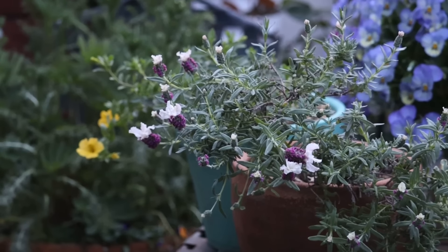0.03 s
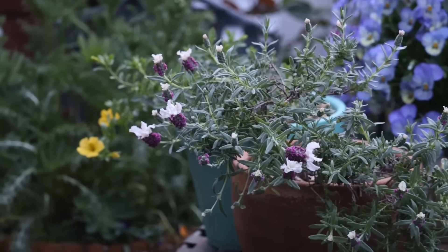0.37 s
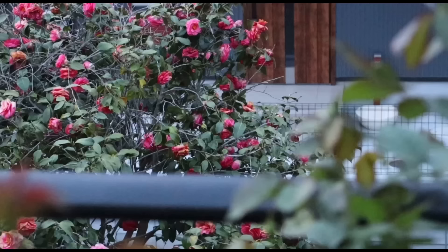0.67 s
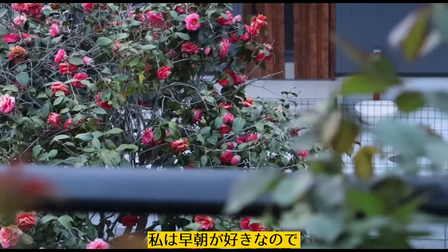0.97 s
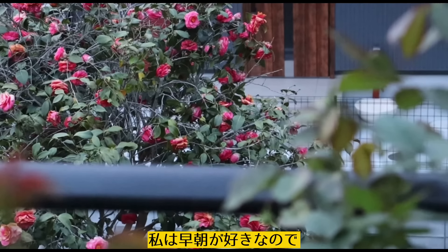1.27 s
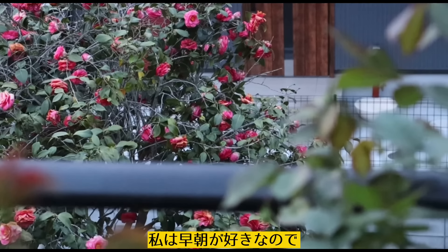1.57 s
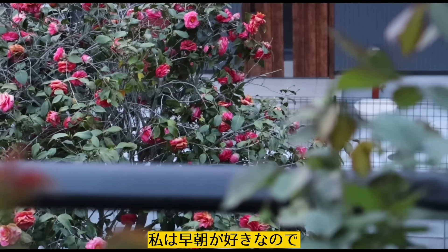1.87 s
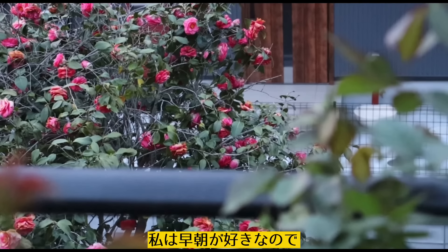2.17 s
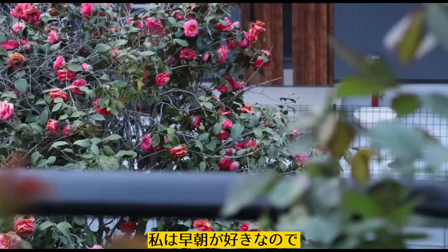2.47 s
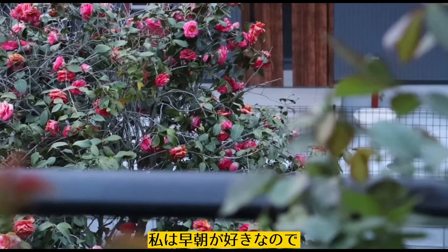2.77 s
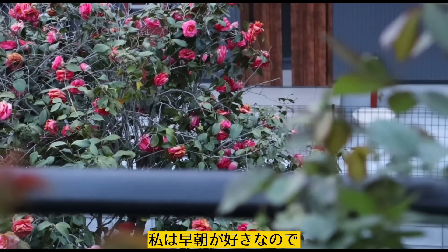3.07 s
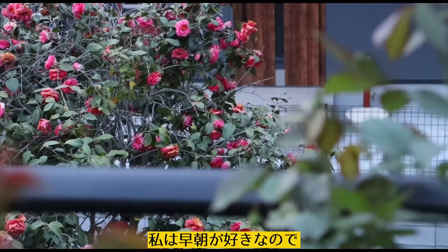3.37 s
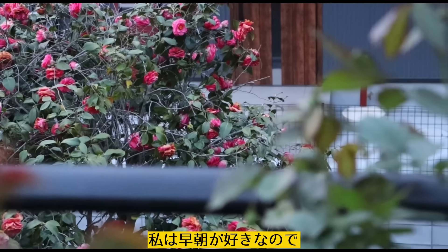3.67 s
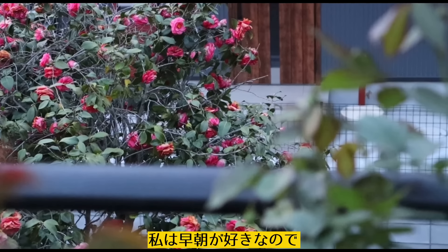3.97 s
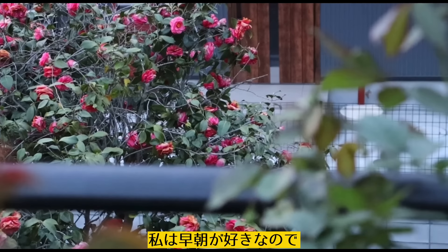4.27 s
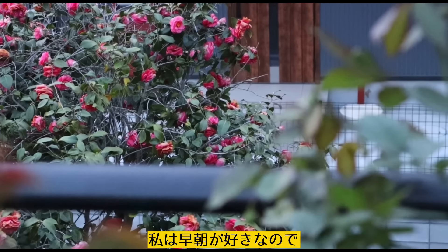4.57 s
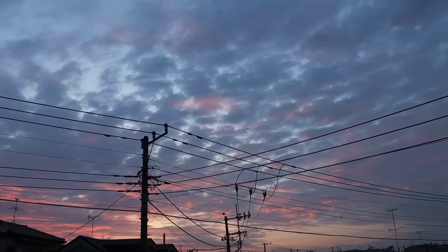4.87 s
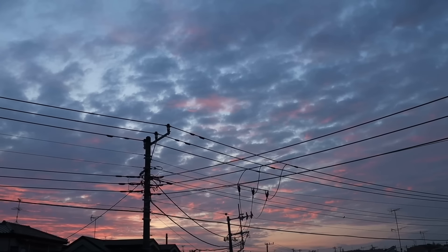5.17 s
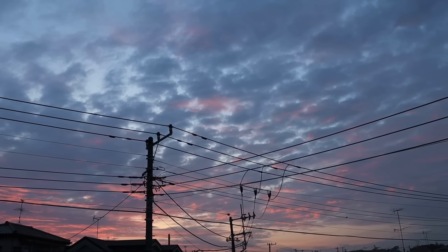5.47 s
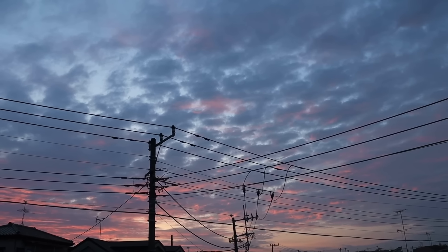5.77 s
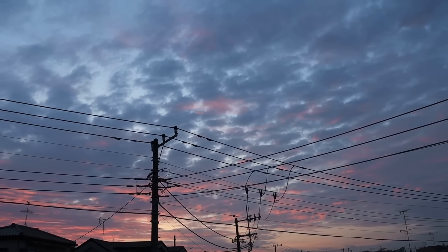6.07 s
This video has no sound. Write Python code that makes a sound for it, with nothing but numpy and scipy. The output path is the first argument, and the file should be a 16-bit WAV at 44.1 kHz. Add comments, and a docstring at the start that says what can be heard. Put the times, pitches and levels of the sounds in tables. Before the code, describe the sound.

A small bird gives sharp chinks, harsh falling calls and rising whistles, with soft twittering between, over a faint distant town.

```python
"""A small bird in a town garden

Over the low wash of a distant town a bird twitters softly between its calls: warbled chinks, harsh
falling chacks and chirps that end in a rising whistle. The two sides of its syrinx are the source,
its throat the filter. Walls and shrubs throw the calls back, and a few tiny ticks come late."""
import sys
import numpy as np
from scipy import signal
from scipy.fft import rfft, irfft
from scipy.io import wavfile
from scipy.ndimage import map_coordinates

SR = 44100
rng = np.random.default_rng(int(sys.argv[2]) if len(sys.argv) > 2 else 0)


def bounce(signal):
    """Save signal as a 16-bit WAV file at the path given by the first command-line argument."""
    frames = np.transpose(np.atleast_2d(signal))
    limited = np.clip(frames, -1, 1)
    pcm = np.round(limited * 32767).astype(np.int16)
    wavfile.write(sys.argv[1], SR, pcm)


N = 270333

# A short high rasp. Every note has the fields length_s, from_hz, to_hz, turn_s, glide_s, level_db,
# attack_s, release_s, overtones_db, rough; some add scoop, droop, warble, hold_s, fade_db.
RASP_NOTE = dict(length_s=0.0367, from_hz=4800, to_hz=5900, turn_s=0.0076, glide_s=0.0028, level_db=-10, attack_s=0.034, release_s=0.0025, overtones_db=(-15, -4),
             rough=(1.1, 0.58))


def undb(db):
    """Amplitude ratio of a level in decibels."""
    return 10 ** (np.asarray(db) / 20)


def unit(x):
    """Normalisation to rms 1."""
    return x / np.sqrt(np.mean(x ** 2))


def gain_at(hz, points):
    """Frequency response: gain between (frequency_hz, level_db) points on a log-frequency axis."""
    f, db = np.transpose(points)
    return undb(np.interp(np.log(np.maximum(hz, 1)), np.log(f), db))


def noise(points, size):
    """Spectral shaping: white noise filtered to the given spectrum, at rms 1."""
    white = rfft(rng.standard_normal(size))
    return unit(irfft(white * gain_at(np.fft.rfftfreq(size, 1 / SR), points), size))


def stereo_noise(points, alike_hz=600):
    """A diffuse field of rms 1: the two sides are coherent in the bass, unrelated in the treble."""
    f = np.fft.rfftfreq(N, 1 / SR)
    mid, side = (rfft(noise(points, N)) for _ in range(2))
    coherence = .97 / (1 + (f / alike_hz) ** 2)
    spectra = mid * np.sqrt(1 + coherence) + side * np.sqrt(1 - coherence) * np.array([[1], [-1]])
    return unit(irfft(spectra, N))


def flutter(rate_hz, size):
    """Random modulation: a smooth wandering with a spread near 1."""
    position = np.arange(size) / SR * rate_hz
    return map_coordinates(rng.standard_normal(int(position[-1]) + 2), [position], order=2, mode="nearest")


def add(track, start_s, sound):
    """Superposition: a sound joins the track at start_s."""
    i = max(int(start_s * SR), 0)
    part = sound[:max(N - i, 0)]
    track[i:i + len(part)] += part


def town(hiss_db=-61, hum_hz=100, hum_db=-66, whine_hz=520, whine_db=-9, whine_s=5.6, sag_hz_per_s=45):
    """Distant sources sum to a diffuse wash with hum and hiss; traffic ebbs and returns as a drone."""
    # noise spectra: frequency_hz, density_db
    wash_spectrum = [(15, -50), (25, -23), (70, -2), (119, 1), (257, -3), (470, -16.5), (642, -12.5),
                     (730, -15.5), (961, -8.5), (1550, -19), (1860, -14.5), (2000, -30), (2600, -41),
                     (4400, -120)]
    traffic_spectrum = [(100, -21), (300, 3), (700, 1), (1100, -2), (1800, -7.5), (5000, -13), (9000, -57)]
    drone_spectrum = [(100, -23), (210, 4), (330, 1), (440, 4), (530, -1.5), (640, -21), (850, -22),
                      (1100, 2), (1500, -2), (4000, -20)]
    hiss_spectrum = [(1000, -58), (2000, -3), (4000, -1), (6000, -4), (8000, -9.5), (12500, -9),
                     (13400, -6.5), (13900, -15), (14500, 4.5), (16000, -99)]
    # ebb and return of far traffic: time_s, traffic_db, drone_db
    traffic_levels = [(0, -52, -81), (.5, -51, -78), (.9, -56.5, -83), (4.4, -55.5, -76), (5, -56, -57),
                      (6.1, -54, -55.5)]
    t = np.arange(N) / SR
    times, *levels = np.transpose(traffic_levels)
    traffic_db, drone_db = (np.interp(t, times, db) + 0.55 * flutter(3.43, N) for db in levels)
    wash = stereo_noise(wash_spectrum, alike_hz=750) * undb(-53.5 + 0.5 * flutter(4.75, N))
    traffic = stereo_noise(traffic_spectrum) * undb(traffic_db)
    drone = stereo_noise(drone_spectrum) * undb(drone_db)
    hum = undb(hum_db + 1.6 * flutter(3.57, N)) * np.sin(2 * np.pi * hum_hz * t + flutter(3.6, N))
    whine_phase = 2 * np.pi * np.cumsum(whine_hz - sag_hz_per_s * (t - whine_s)) / SR
    whine = undb(drone_db + whine_db + 2 * flutter(7.3, N)) * np.sin(whine_phase + flutter(9, N))
    return wash + traffic + drone + hum + whine + undb(hiss_db) * stereo_noise(hiss_spectrum)


def membrane(hz, rough, jitter=0.0984, shimmer=1.0, jitter_hz=900):
    """Jitter and shimmer: the phase and swing of a syrinx membrane wander when it vibrates roughly."""
    wander = np.exp(jitter * rough * flutter(jitter_hz, len(hz)))
    swing = 1 + .6 * np.tanh(shimmer * rough * flutter(jitter_hz, len(hz)))
    return 2 * np.pi * np.cumsum(hz * wander) / SR, swing


def twitters(faint_per_s=3, faint_s=.06, faint_db=-57, low_hz=2180, high_hz=5700):
    """Frequency glides of one membrane make quiet slurred or scratchy notes; fainter notes of distant birds
    come at random times."""
    # soft notes: start_s, length_s, first_hz, last_hz, level_db, roughness
    slurs = [(.025, 0.083, 4210, 3310, -52, 1), (0.144, 0.18, 3080, 3000, -60.5, 0),
             (0.548, 0.048, 5200, 3420, -50.5, 0.85), (0.641, 0.09, 4200, 3780, -45.5, .9),
             (0.685, 0.041, 3200, 1850, -49, 0.96), (1.097, 0.19, 6880, 5700, -52, 0.58),
             (1.136, 0.039, 5400, 4620, -40, 0.83), (1.768, 0.055, 5800, 5150, -56, .04),
             (1.815, .075, 5100, 3350, -40.5, 0.54), (2.327, 0.068, 4940, 4500, -41, 0.81),
             (2.9, 0.039, 4000, 2450, -49, 0.8), (2.959, .079, 5340, 4940, -56, 0.06),
             (2.96, 0.087, 2480, 2264, -50, 0.31), (3.389, 0.035, 6200, 4720, -40, 0.18),
             (3.88, 0.043, 5100, 5300, -40, .5), (4.395, 0.099, 5700, 4980, -41.5, 1),
             (4.754, .08, 3000, 3890, -39.5, 0.31), (4.792, 0.019, 2550, 3000, -39, 0.14),
             (4.904, 0.027, 2430, 2150, -39.5, 0.62), (4.906, 0.0256, 4850, 4140, -27.5, 0.38),
             (4.976, 0.028, 3900, 3160, -41, 0.04), (5.062, .036, 3250, 4570, -38, 0.25),
             (5.234, 0.039, 1960, 1620, -51.5, 0.17), (5.277, 0.034, 5850, 4300, -30, 0.28),
             (5.532, 0.062, 2180, 1866, -51.5, 0.16), (5.747, .03, 2000, 2900, -57, 0),
             (5.808, .06, 5670, 4440, -55, 0.2), (5.894, 0.051, 2880, 4140, -41.5, .22),
             (5.939, 0.021, 4600, 3600, -38.5, .13)]
    out, faint = np.zeros(N), []
    for when, height, bend in rng.uniform(size=(int(faint_per_s * N / SR), 3)):
        hz = low_hz * (high_hz / low_hz) ** height
        faint.append((when * N / SR, faint_s, hz, hz * np.exp(0.213 * (2 * bend - 1)), faint_db, .1))
    for start_s, length_s, first_hz, last_hz, db, rough in slurs + faint:
        progress = np.linspace(0, 1, int(length_s * SR))
        hz = first_hz * (last_hz / first_hz) ** progress
        phase, swing = membrane(hz, rough, jitter=0.1846, shimmer=0.33, jitter_hz=1100)
        envelope = np.abs(np.sin(np.pi * progress)) ** 0.46
        add(out, start_s, undb(db) * envelope * swing * np.sin(phase))
    return out


def warbling(t, depth, crest_s, rate_hz, speedup_hz_per_s, decay_s):
    """Frequency modulation: a pitch ratio whose swing quickens and dies away after crest_s."""
    since = t - crest_s
    extent = depth * np.exp(-np.maximum(since, 0) / decay_s)
    return np.exp(extent * np.cos(2 * np.pi * since * (rate_hz + speedup_hz_per_s * since / 2)))


def gesture(t, length_s, from_hz, to_hz, turn_s, glide_s, level_db, attack_s, release_s,
            overtones_db, rough, scoop=0, droop=0, warble=None, hold_s=0, fade_db=0, scoop_s=.012):
    """Joint modulation: one slide, steepest at turn_s, carries pitch, overtones and roughness."""
    slide = (1 + np.tanh((t - turn_s) / glide_s / 2)) / 2
    onset_rise = 1 - scoop * np.maximum(1 - t / scoop_s, 0) ** 2
    end_fall = 1 - droop * (t / length_s) ** 10
    hz = from_hz * (to_hz / from_hz) ** slide * onset_rise * end_fall
    if warble:
        hz *= warbling(t, **warble)
    envelope = np.clip(np.minimum(t / attack_s, (length_s - t) / release_s), 0, 1)
    gain = envelope * undb(level_db + np.interp(t, [hold_s, length_s], [0, fade_db]))
    return hz, gain, np.interp(slide, [0, 1], overtones_db), np.interp(slide, [0, 1], rough)


def syllable(note, pitch=1, stretch=1, bright_db=0, overtone_fall=1.0, even_db=0, air_db=-33, count=8):
    """Source and filter: the throat favours harmonics near 4 kHz, and air hisses through the beak."""
    # resonance of throat and beak: frequency_hz, gain_db
    throat = [(900, -26), (1400, -17.5), (2000, -13), (2900, -2), (4000, 2), (5300, -2), (6400, -11),
              (8000, -17), (10500, -10), (13000, -4.5), (16000, -21)]
    t = np.arange(int(note["length_s"] * stretch * SR)) / SR
    hz, gain, overtones_db, rough = gesture(t / stretch, **note)
    hz = hz * pitch
    phase, swing = membrane(hz, rough)
    tone = gain_at(hz, throat) * np.sin(phase)
    for k in range(2, count + 1):
        # a membrane that swings evenly to both sides has weak even harmonics
        share = undb(overtones_db + bright_db + even_db * (k % 2 == 0)) * (2 / k) ** overtone_fall
        tone += share * gain_at(k * hz, throat) * (k * hz < SR / 2) * np.sin(k * phase)
    air = noise([(1200, -27), (2500, -8.5), (5000, 6.5), (8000, -8), (12000, -12), (16000, -12.5)],
                len(t))
    return gain * (swing * tone + undb(air_db + bright_db) * air)


def chinks(rasp_lead_s=.029, undertone_s=0.026, tail_s=.042):
    """Biphonation: one side of the syrinx sings rasp, warble and tail; the other joins faintly below."""
    # notes: fields as in RASP_NOTE
    chink = dict(length_s=.042, from_hz=4550, to_hz=4085, turn_s=0.01688, glide_s=.004, scoop=0.116, droop=0.346, level_db=-1, attack_s=0.0048, release_s=0.0064, overtones_db=(0, -12),
             rough=(0.13, 0.024),
             warble=dict(depth=0.227, crest_s=0.0089, rate_hz=44, speedup_hz_per_s=2710, decay_s=0.018))
    tail = dict(length_s=0.0236, from_hz=3250, to_hz=3423, turn_s=0.0126, glide_s=0.0038, level_db=-4.5, attack_s=0.0033, release_s=0.0034, overtones_db=(-5, -11),
            rough=(0.18, 0.38),
            warble=dict(depth=0.078, crest_s=.0075, rate_hz=90.3, speedup_hz_per_s=300, decay_s=0.047))
    undertone = dict(length_s=.036, from_hz=2270, to_hz=1730, turn_s=.03, glide_s=0.0054, level_db=-20.5, attack_s=0.0016, release_s=.003, overtones_db=(-38, -32),
                 rough=(0.62, .2))
    # chink calls: start_s, level_db, pitch_ratio, length_ratio
    calls = [(.790, -13.5, 0.99, 1), (2.576, -13.5, 0.97, 1), (3.1659, -12.5, 0.96, 0.92)]
    out = np.zeros(N)
    for start_s, db, pitch, stretch in calls:
        gain = undb(db)
        add(out, start_s - rasp_lead_s, gain * syllable(RASP_NOTE, air_db=-7.5))
        add(out, start_s, gain * syllable(chink, pitch, stretch, even_db=-9, air_db=-22.5))
        ending = syllable(tail, pitch, stretch, even_db=-8, air_db=-18)
        add(out, start_s + tail_s * stretch, gain * ending)
        add(out, start_s + undertone_s, gain * syllable(undertone, air_db=-52))
    return out


def chacks(creak_s=0.079, hiss_lead_s=0.0088, hiss_db=-7):
    """Biphonation: after a hiss both sides of the syrinx sound at once and fall into a low creak."""
    # notes: fields as in RASP_NOTE
    low_voice = dict(length_s=0.066, from_hz=5050, to_hz=1283, turn_s=.029, glide_s=.013, scoop=0.52, level_db=0, attack_s=0.013, release_s=0.027, overtones_db=(5.5, -28.5),
                 rough=(0.071, 0.76))
    high_voice = dict(length_s=0.065, from_hz=5900, to_hz=2848, turn_s=.0185, glide_s=.0035, scoop=.55, level_db=-0.5, attack_s=.011, hold_s=0.028, fade_db=-31, release_s=.004, overtones_db=(-19, -11),
                  rough=(0.082, 0.39))
    creak = dict(length_s=0.06, from_hz=1300, to_hz=867, turn_s=0.017, glide_s=0.0176, level_db=-.5, attack_s=0.014, release_s=0.011, overtones_db=(2, -1.5),
             rough=(0.053, 0.044))
    # chack calls: start_s, level_db, pitch_ratio, length_ratio, brightness_db, creak_db
    calls = [(1.397, -18.5, 1, 0.99, 0.5, -29), (4.495, -20, 1, 0.96, 0.5, -32),
             (4.917, -27.5, 0.98, 0.81, -8, -53), (5.984, -23.5, 0.91, 0.98, -4.5, -34.5)]
    out = np.zeros(N)
    for start_s, db, pitch, stretch, bright_db, creak_db in calls:
        hiss = syllable(RASP_NOTE, pitch=0.54, stretch=0.4, bright_db=bright_db, air_db=2)
        add(out, start_s - hiss_lead_s, undb(db + hiss_db) * hiss)
        add(out, start_s, undb(db) * syllable(low_voice, pitch, stretch, bright_db, air_db=-52))
        add(out, start_s, undb(db) * syllable(high_voice, pitch, stretch, bright_db, air_db=-8))
        ending = syllable(creak, pitch, overtone_fall=2.5, air_db=-55)
        add(out, start_s + creak_s, undb(creak_db) * ending)
    return out


def chirps(flick_lead_s=.012):
    """Frequency sweeps: a quick downward flick, a falling warble, then a nearly pure rising whistle."""
    # notes: fields as in RASP_NOTE
    flick_note = dict(length_s=0.01, from_hz=3300, to_hz=1620, turn_s=.003, glide_s=.003, level_db=-14, attack_s=0.0018, hold_s=.002, fade_db=-9.5, release_s=.002, overtones_db=(-3.5, 17),
                  rough=(.06, .06))
    warble_note = dict(length_s=0.086, from_hz=4200, to_hz=1408, turn_s=.036, glide_s=.0072, level_db=-0.5, attack_s=0.0042, hold_s=0.015, fade_db=-21.5, release_s=0.02, overtones_db=(-10, 7),
                   rough=(0.038, 0.11),
                   warble=dict(depth=0.165, crest_s=.0075, rate_hz=88, speedup_hz_per_s=5540, decay_s=0.018))
    whistle_note = dict(length_s=.122, from_hz=1880, to_hz=2962, turn_s=.028, glide_s=0.01352, droop=0.095, level_db=4, attack_s=0.045, hold_s=0.054, fade_db=-7.5, release_s=0.011, overtones_db=(-30, -13),
                    rough=(.035, 0.034))
    # chirp calls: start_s, level_db, pitch_ratio, length_ratio, brightness_db,
    # whistle_start_s, whistle_db, whistle_pitch_ratio
    calls = [(1.9466, -16.5, 0.95, 1.03, -1.5, 2.016, -21, 1.004),
             (3.7, -16, 0.95, 1.05, -3, 3.773, -21.5, 0.98),
             (5.307, -20, 0.91, 1.08, -12, 5.38, -24, 1.015)]
    out = np.zeros(N)
    for start_s, db, pitch, stretch, bright_db, whistle_s, whistle_db, whistle_pitch in calls:
        flick = syllable(flick_note, pitch, 0.94, bright_db, overtone_fall=0.75, air_db=-32)
        warble = syllable(warble_note, pitch, stretch, bright_db, overtone_fall=1.53, air_db=-29)
        whistle = syllable(whistle_note, whistle_pitch, 1, bright_db,
                           overtone_fall=1.6, even_db=-8, air_db=-56, count=4)
        add(out, start_s - flick_lead_s, undb(db) * flick)
        add(out, start_s, undb(db) * warble)
        add(out, whistle_s, undb(whistle_db) * whistle)
    return out


def ticks(decay_s=0.0011, left_db=-1):
    """Broadband transients: bright noise with a fast exponential decay is heard as tiny close clicks."""
    # dry clicks: start_s, level_db
    clicks = [(5.096, -36.5), (5.122, -38), (5.159, -36), (5.169, -38), (5.219, -36), (5.269, -33),
              (5.686, -43), (5.692, -34), (5.824, -42)]
    out, t = np.zeros(N), np.arange(512) / SR
    for start_s, db in clicks:
        burst = noise([(1500, -6), (5000, -10), (7300, 3), (10000, -6), (16000, -0.5)], len(t))
        add(out, start_s, undb(db - 2.5) * np.exp(-t / decay_s) * burst)
    return out * undb([[left_db], [0]])


def reverberation(t, build_s, t60_s):
    """Envelope of scattered sound, at rms 1: it builds up, then decays by 60 dB in t60_s."""
    return unit((1 - np.exp(-t / build_s)) * np.exp(-np.log(1000) * t / t60_s))


def garden(bird, shade, direct_db, left_lag_s=.000017, scatter_left_db=1):
    """Reflection and scattering: near surfaces echo, shrubs scatter quickly and house fronts slowly."""
    # reflections from near surfaces: delay_s, level_db
    echoes = [(.0031, -8.5), (.0094, -6.5), (.037, -31), (.052, -18)]
    # scatter from shrubs and houses: centre_hz, early_db, late_db, late_t60_s
    scatter = [(1000, 0, -38, .8), (2000, 1, -5.5, 1), (3000, -1, -8.5, 0.97), (4300, -3.5, -7.5, 0.94),
               (5670, -11, -12.5, 0.81), (7620, -20, -11, 0.44), (11000, -23, -20.5, 0.43),
               (16300, -30, -24, .25)]
    size, lead = 65536, 128  # samples
    t, f = np.arange(size) / SR, np.fft.rfftfreq(size, 1 / SR)
    centres = np.log([row[0] for row in scatter])
    # the bird sits to the right, so its direct sound reaches the left side later
    response = undb(direct_db) * np.array([np.exp(-2j * np.pi * f * left_lag_s), np.ones(len(f))])
    for delay_s, db in echoes:
        # each echo has its own direction, so the two sides get it at slightly different times
        arrival_s = delay_s + rng.uniform(0, 0.0003, (2, 1))
        response += undb(db) * np.exp(-2j * np.pi * f * arrival_s)
    for share, (_, early_db, late_db, t60_s) in zip(np.eye(len(scatter)), scatter):
        early = undb(early_db) * reverberation(t, build_s=0.0027, t60_s=0.26)
        late = undb(late_db) * reverberation(t, build_s=0.025, t60_s=t60_s)
        tail = np.hypot(early, late) * rng.standard_normal((2, size)) / np.sqrt(size)
        band = np.sqrt(np.interp(np.log(f + 1), centres, share))
        response += rfft(tail) * band * undb([[scatter_left_db], [0]])
    response[0] *= gain_at(f, shade)  # the left microphone faces away from the bird
    impulse = np.roll(irfft(response), lead, axis=1)[:, :SR]
    return signal.fftconvolve(bird[None], impulse, axes=1)[:, lead:N + lead]


def scene(hop_s=4.7):
    """Time and level cues place the calls: first on an open perch, then further right in a shrub."""
    # loss on the left side from each position: frequency_hz, gain_db
    perch_shade = [(1000, -5.5), (2500, -7.3), (4200, -5.5), (8000, -4.5), (12000, -10.5)]
    shrub_shade = [(1000, -5), (2700, -8.5), (4300, -4.5), (7000, -3), (12000, -5)]
    calls = chinks() + chacks() + chirps()
    hopped = np.arange(N) / SR > hop_s
    open_perch = garden(calls * ~hopped, perch_shade, direct_db=1.5)
    in_shrub = undb(1) * garden(calls * hopped, shrub_shade, direct_db=1.5, left_lag_s=.0002)
    through_leaves = undb(2.5) * garden(twitters(), perch_shade, direct_db=-3.5)
    return open_perch + in_shrub + through_leaves + ticks() + town()


def record(dry, top_hz=16000):
    """A steep low-pass filter cuts the highest treble."""
    return signal.sosfilt(signal.ellip(10, .2, 70, top_hz, fs=SR, output="sos"), dry)


dry = scene()
out = record(dry)
bounce(out)
```